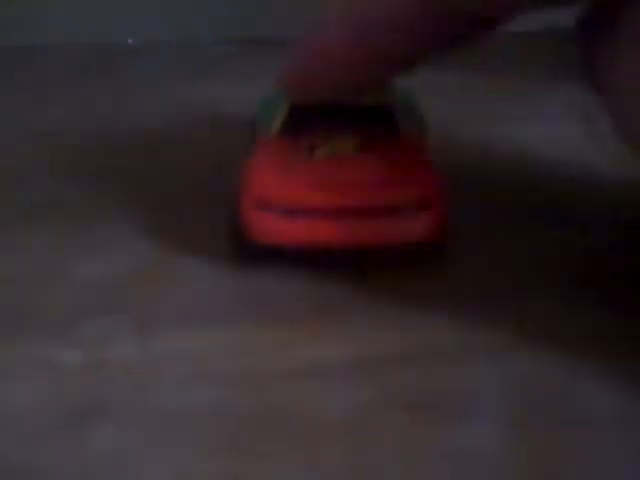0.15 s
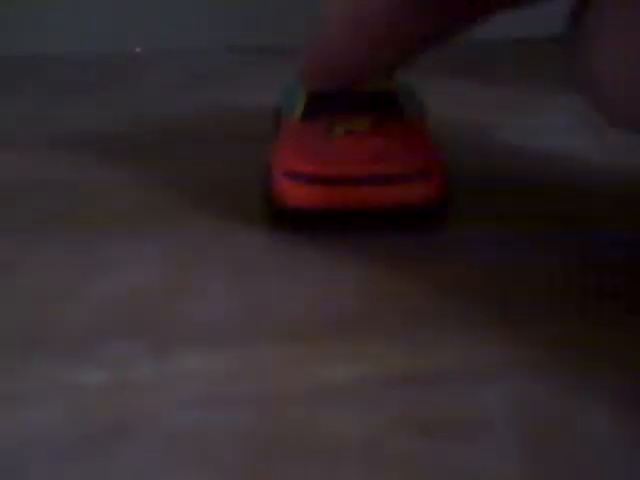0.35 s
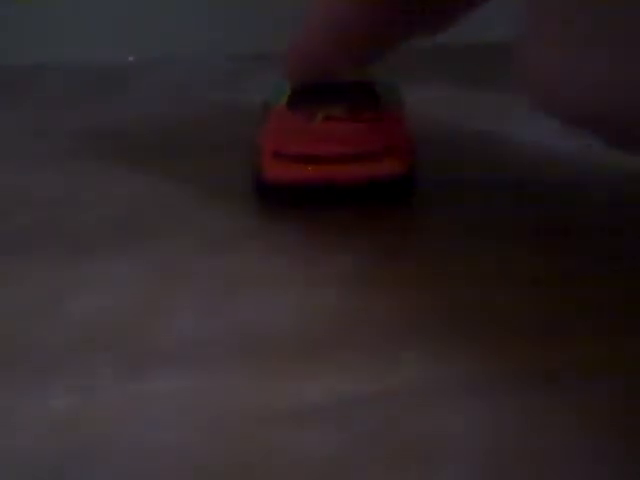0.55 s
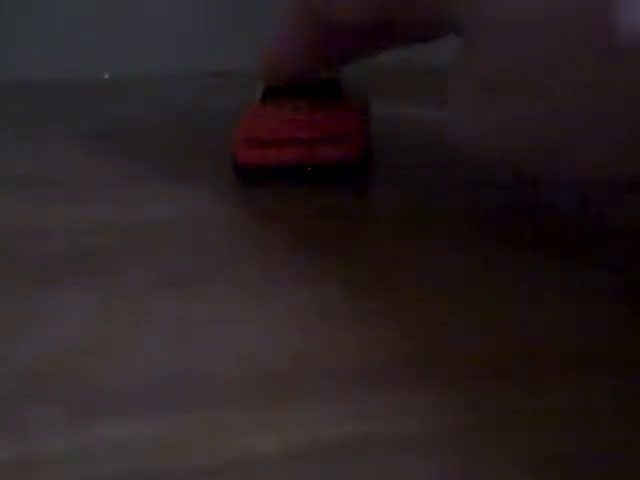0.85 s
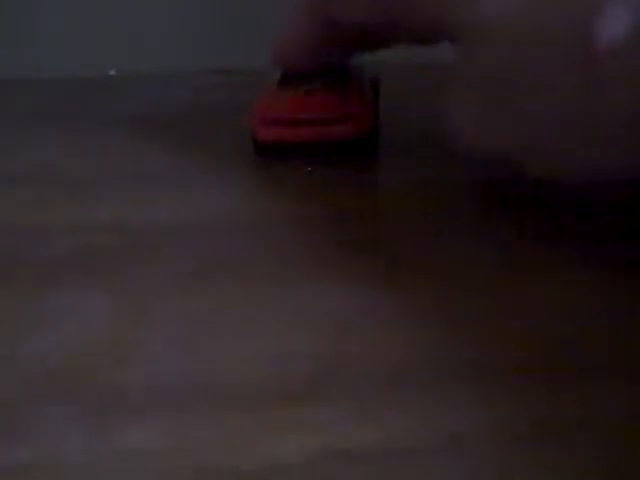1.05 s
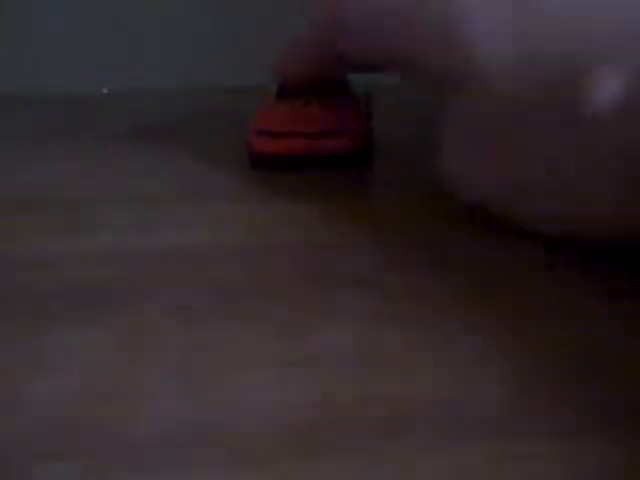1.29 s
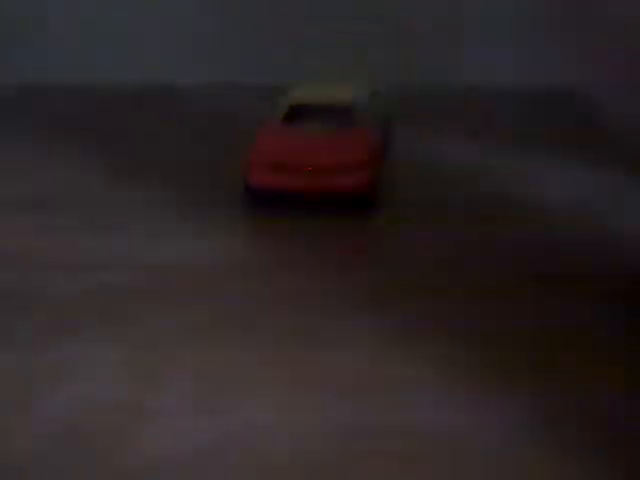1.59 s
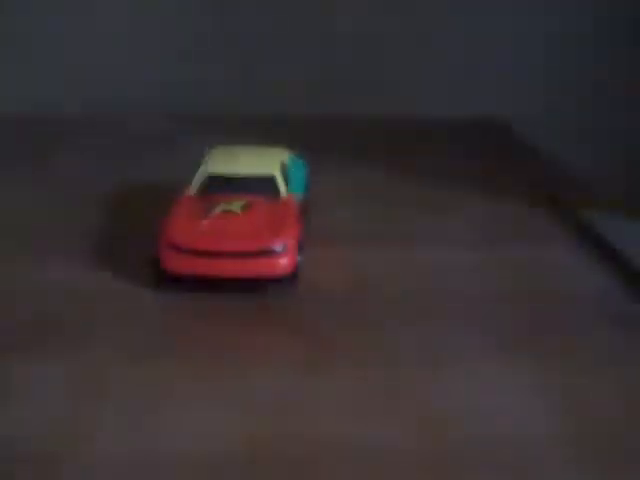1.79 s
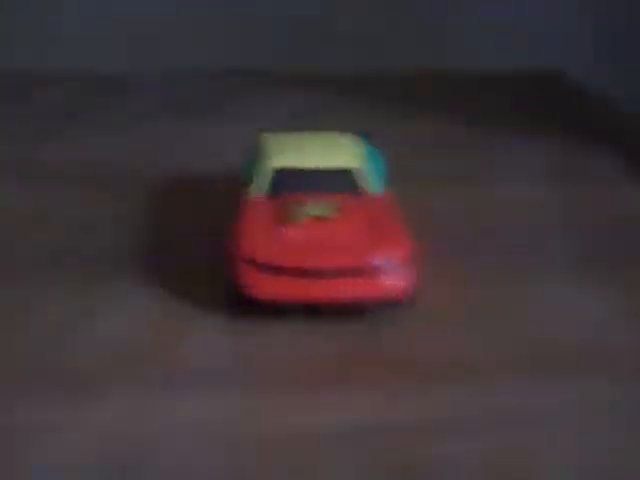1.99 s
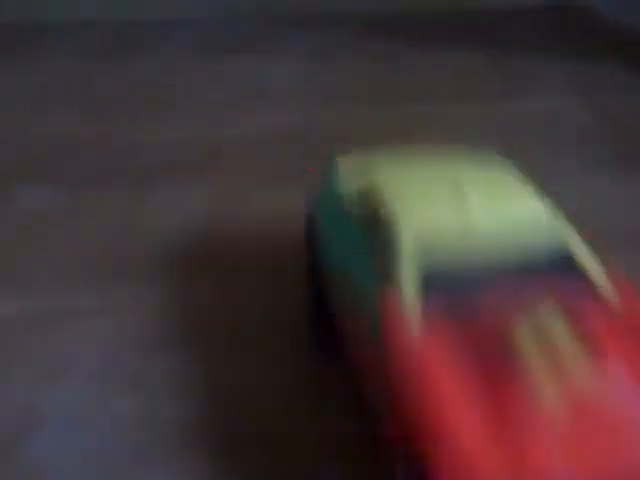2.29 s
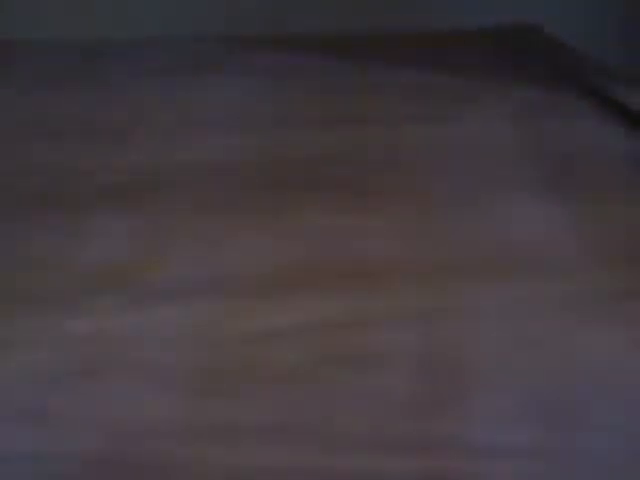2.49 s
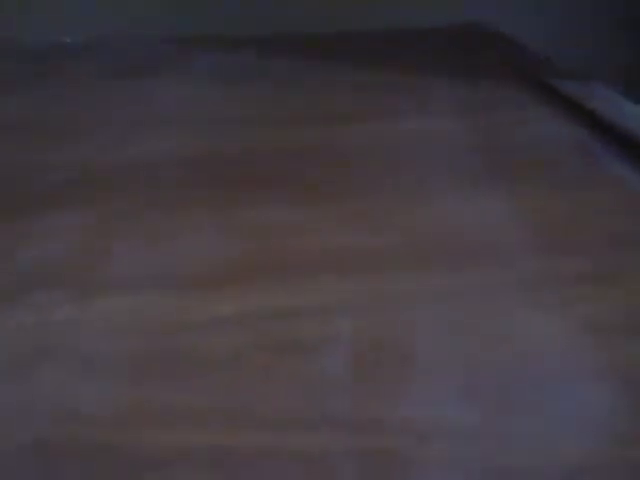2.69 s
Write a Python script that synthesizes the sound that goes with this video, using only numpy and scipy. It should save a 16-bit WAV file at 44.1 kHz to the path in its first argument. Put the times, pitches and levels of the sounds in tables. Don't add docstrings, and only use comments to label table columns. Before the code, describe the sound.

A pull-back toy car is wound on a wooden table with sharp ratchet clicks, then released; its gears rattle quickly past a very close microphone and it knocks to rest in a quiet small room.

```python
import sys
import numpy as np
from scipy import signal
from scipy.fft import rfft, irfft, next_fast_len
from scipy.io import wavfile
from scipy.ndimage import uniform_filter1d

SR = 44100
rng = np.random.default_rng(int(sys.argv[2]) if len(sys.argv) > 2 else 0)


def int16_out(signal):
    q = np.round(np.clip(np.atleast_2d(signal).T, -1, 1) * 32767)
    wavfile.write(sys.argv[1], SR, q.astype(np.int16))


def amplitude_ratio(level_db):
    exponent = np.asarray(level_db, float) / 20
    return 10 ** exponent


N = 125685
RUN_START_S, RUN_END_S = 1.5, 2.56
SLIPS_PER_S, SLIP_DB = 350, 5


def clock():
    return np.arange(N) / SR


def evened(x):
    return x / np.sqrt(np.mean(x ** 2) + 1e-20)


def read(points, hz):
    f, value = np.transpose(points)
    return np.interp(np.log(hz + 1), np.log(f + 1), value)


def control(table, column):
    rows = np.array(table)
    return amplitude_ratio(np.interp(clock(), rows[:, 0], rows[:, column]))


def stepped(s, values):
    latest = np.searchsorted(s * SR - 40, np.arange(N)) - 1
    return np.asarray(values)[np.maximum(latest, 0)]


def colour(x, points):
    log_gain = np.log(amplitude_ratio(read(points, abs(np.fft.fftfreq(2048, 1 / SR)))))
    taps = np.fft.ifft(np.exp(np.conj(signal.hilbert(log_gain)))).real[:1024]
    return signal.oaconvolve(x, taps / np.linalg.norm(taps))[:N]


def filtered(x, order, hz, kind="low"):
    return signal.sosfilt(signal.butter(order, hz, kind, fs=SR, output="sos"), x)


def resonate(x, hz, width_hz):
    turn = np.exp(2j * np.pi * np.cumsum(hz * np.ones(N)) / SR)
    r = np.exp(-np.pi * width_hz / SR)
    return 2 * (turn * signal.lfilter([1 - r], [1, -r], x / turn)).real


def body(x, modes):
    return sum((-1) ** k * amplitude_ratio(db) * resonate(x, hz, width) for k, (hz, width, db) in enumerate(modes))


def dying_tone(start_s, level_db, pitch_hz, t60_s):
    since = np.maximum(clock() - start_s, 0)
    return amplitude_ratio(level_db - 60 * since / t60_s) * np.sin(2 * np.pi * pitch_hz * since)


def grit(per_s, spread_db):
    size = amplitude_ratio(spread_db * np.minimum(rng.exponential(1, N), 4))
    return evened(rng.standard_normal(N) * size * (rng.random(N) < per_s / SR))


def chatter(s, db, hold_s, rise_s):
    fade_s, tail_db, tail_s, evenness = 0.0019, -20, 0.021, 0.52
    out, t = np.zeros(N + 2000), np.arange(2000) / SR
    for at, gain, hold in zip(s, amplitude_ratio(db), hold_s * np.ones(len(s))):
        decay = np.exp(-np.maximum(t - hold, 0) / fade_s) + amplitude_ratio(tail_db) * np.exp(-t / tail_s)
        shape = np.minimum(t / rise_s, 1) ** 2 * decay
        impacts, lumps = rng.standard_normal((2, 2000))
        clumps = abs(uniform_filter1d(lumps, size=24)) * 6 + evenness
        burst = shape * clumps * impacts
        burst *= np.linalg.norm(shape) / np.linalg.norm(burst)
        out[round(at * SR):][:2000] += 0.32 * gain * burst
    return out[:N]


def running():
    t = clock()
    return uniform_filter1d(1. * ((t > RUN_START_S) & (t < RUN_END_S)), size=3000)


# pitch_hz, level_db
AIR_SPECTRUM = [(12, -36), (20, -6), (108, -0.5), (818, -19), (2930, -16), (12400, -28), (15000, -59)]


def air():
    hz = np.fft.rfftfreq(N, 1 / SR)
    hiss = irfft(rfft(rng.standard_normal((2, N))) * amplitude_ratio(read(AIR_SPECTRUM, hz)), N)
    return amplitude_ratio(-58.5 + np.array([[4], [1]])) * evened(hiss)


def room(x, t60_s):
    t = np.arange(round(.4 * SR)) / SR
    signs = rng.choice([-1., 1.], (2, len(t)))
    taps = signs * (rng.random((2, len(t))) < .2) * amplitude_ratio(-60 * t / t60_s)
    taps /= np.linalg.norm(taps, axis=1, keepdims=True)
    return signal.fftconvolve(x[None], taps, axes=1)[:, :N]


# pitch_hz, likeness (0 to 1)
PORT_LIKENESS = [(100, .7), (400, .95), (10000, .62)]
# pitch_hz, level_db
PORT_SHADE = [(60, 6), (300, 11), (2800, 10.5), (5500, 13.5), (10000, 22)]
# start_s, level_db
PASSING_BY = [(2.5, 0), (2.68, 6.5)]


def ports(x):
    lead_s = 2.3e-5
    size = next_fast_len(N + 4096)
    hz = np.fft.rfftfreq(size, 1 / SR)
    same = np.clip(read(PORT_LIKENESS, hz), 0, 1)
    scatter = rfft(room(np.ones(1), .04)[0], size)
    path = same * np.exp(2j * np.pi * hz * lead_s) + np.sqrt(1 - same ** 2) * scatter
    right = irfft(rfft(x, size) * path * amplitude_ratio(-read(PORT_SHADE, hz)), size)[:N]
    return np.array([x, control(PASSING_BY, 1) * right])


# start_s, level_db
HISS_LEVEL = [(.08, -86), (.2, -60.5), (.33, -41), (.6, -44), (1.3, -52), (1.36, -43), (1.41, -60.5),
              (1.465, -43.5), (1.53, -64), (1.75, -36), (2.44, -35.5), (2.58, -44), (2.69, -27),
              (2.745, -32.5), (2.8, -42.5)]


def hiss_gain():
    return control(HISS_LEVEL, 1)


# start_s, pitch_hz
GROAN_PITCH = [(.3, 690), (.95, 704), (1.2, 820), (1.3, 660)]


def groan_hz():
    return np.interp(clock(), *np.transpose(GROAN_PITCH))


# start_s, level_db, upper_modes_db
ROLLING = [(0, -56, -0.5), (.19, -48.5, -8), (.25, -41, 1), (.37, -34.5, -2.5), (.62, -43.5, -9),
           (.85, -40.5, -8), (1.1, -57.5, 12), (1.3, -47.5, -1), (1.42, -59.5, -0.5), (1.5, -51.5, -1.5),
           (1.55, -43, -3), (1.83, -37, -1.5), (1.93, -44, 0.5), (2.53, -50, -1.5), (2.62, -66.5, -5)]
# pitch_hz, width_hz, level_db
WOOD_MODES = [(230, 11.5, 1.5), (311, 31, 5), (445, 27, 2), (517.6, 21, 1.5), (842, 6.4, -1),
              (1340, 1210, -7.5)]
# start_s, level_db, pitch_hz
WHEEL_DROPS = [
    (1.536, -38, 480),
    (1.561, -18.5, 480),
    (1.597, -15.5, 483),
    (2.698, -25, 286),
]


def wheels():
    push = uniform_filter1d(grit(700, 2), size=24) + 0.038 * rng.standard_normal(N)
    damping = amplitude_ratio(-9 * (1 - running()))
    low = damping * body(push, WOOD_MODES[:2]) + body(push, WOOD_MODES[2:4])
    high = body(push, WOOD_MODES[4:]) + amplitude_ratio(3) * resonate(push, groan_hz(), 85)
    drum = control(ROLLING, 1) * amplitude_ratio(3.0) * (low + control(ROLLING, 2) * high) / np.std(low)
    for start_s, level_db, pitch_hz in WHEEL_DROPS:
        drum = drum + dying_tone(start_s, level_db, pitch_hz, 0.0066)

    bounce = resonate(resonate(rng.standard_normal(N), 110, 98), 110, 88)
    bounce = amplitude_ratio(-49.5) * running() * evened(bounce)

    slip_density = uniform_filter1d(abs(grit(SLIPS_PER_S, SLIP_DB)), size=300)
    rustle = resonate(resonate(slip_density * rng.standard_normal(N), 2900, 2700), 3030, 2200)
    rustle = amplitude_ratio(-16.5) * hiss_gain() ** 0.64 * evened(rustle)
    return filtered(drum + rustle, 2, 170, "high") + bounce


# pitch_hz, level_db
PAWL_SPECTRUM = [(300, -43), (900, -19.5), (2200, -12.5), (4100, -8), (6000, -7), (7900, -1.5),
                 (10500, -16.5), (14000, -20.5), (15400, -42)]


def hard_plastic(x):
    return colour(x, PAWL_SPECTRUM)


# pitch_hz, width_hz, level_db
SHELL_MODES = [(2050, 102, 4), (2463, 210, 7), (4633, 200, 6.5), (5140, 73, -4.5), (6180, 910, -2),
               (6750, 310, 8.5), (7370, 640, 11)]
# start_s, level_db, chatter_s, hollow_ring_db
FINAL_BUMPS = [
    (2.473, -13, 0.014, 10),
    (2.489, -16, 0.0035, 14.5),
    (2.533, -8, 0.0027, 13),
    (2.536, -9.5, 0.0014, 14.5),
    (2.628, -10.5, 0.0076, -12),
    (2.697, -2, 0.0095, -3),
    (2.714, -13, 0.017, 6.5),
]


def bumps():
    s, db, hold_s, hollow_db = np.transpose(FINAL_BUMPS)
    hits = chatter(s, db, hold_s, 0.0014)
    wide, thud = hard_plastic(hits), amplitude_ratio(-20.5) * hits
    hollow = resonate(thud * amplitude_ratio(stepped(s, hollow_db)), 2870, 1800)
    hollow = amplitude_ratio(13) * (hollow + amplitude_ratio(8.5) * body(hollow, SHELL_MODES[:2]))
    wood = amplitude_ratio(-14) * resonate(body(thud, WOOD_MODES[:2]), 190, 167)
    return wide + amplitude_ratio(-7.0) * body(wide, SHELL_MODES) + wood + hollow


# start_s, level_db, lower_shell_db
GEAR_KNOCKS = [(1.5084, -25, -3), (1.5594, -34.5, 2), (1.566, -26, 3.5), (1.5803, -34, -5),
               (1.596, -29, -4), (1.6044, -28, 5), (1.6142, -25, 0), (1.6405, -23, 1),
               (1.6542, -11, -6), (1.668, -12, -5.5), (1.6807, -12, -13), (1.6967, -9.5, -11),
               (1.707, -16, 1), (1.7225, -23.5, -2.5), (1.7322, -1, -9), (1.7664, -8, -8.5),
               (1.7783, -10.5, -13), (1.789, -6.5, -37), (1.7984, -12, -6), (1.8115, -9, -9),
               (1.8236, -12.5, -2), (1.8365, -1, -6.5), (1.845, -8, -1), (1.8512, -6, -4.5),
               (1.8613, -10.5, -4), (1.8676, -6.5, -5.5), (1.8898, -15, -5),
               (1.8986, -7.5, -8), (1.9074, -11, -8), (1.9164, -7, -6), (1.925, -4.5, -15), (1.933, -9, -9),
               (1.9388, -5, -12), (1.9502, -5.5, -8), (1.959, -5, -22), (1.9636, -4.5, -11),
               (1.9725, -3, -9), (1.9795, -7, -11), (1.988, -4.5, -13), (2.0039, -4, -18), (2.013, -8, 0),
               (2.0184, -8, -12), (2.027, -7, -4.5), (2.0424, -5, -6), (2.0493, -8.5, -12),
               (2.0585, -5, -8), (2.069, -10, -13), (2.0751, -10, -7), (2.0838, -21, -0.5),
               (2.0913, -0.5, -16), (2.102, -1.5, -13), (2.1114, -5, -7), (2.121, -4, -15),
               (2.1317, -12.5, -7.5),
               (2.1468, -8.5, -7.5), (2.1634, -0.5, -21), (2.1729, -12, -12), (2.1797, -11, -6),
                   (2.1905, -7.5, -12), (2.2108, -9.5, -10.5), (2.2201, -11, -12), (2.2347, -4.5, -10),
                   (2.2434, -13.5, -5.5), (2.257, -39, 4), (2.2582, -3.5, -11), (2.2721, -7, -14.5),
                   (2.289, -7, -11.5), (2.3075, -5.5, -14), (2.3182, -5, -14), (2.333, -4, -20),
                   (2.3408, -11.5, -15), (2.3472, -7, -16), (2.357, -11.5, -15), (2.3697, -10, -19),
                   (2.3812, -10, -15), (2.3946, -5, -9), (2.4082, -3.5, -7), (2.4157, -6, -3.5),
                   (2.4283, -10, -3), (2.4336, -4.5, -6), (2.452, -19, -4.5)]
# pitch_hz, level_db
GEAR_SPECTRUM = [(530, -64), (900, -22.5), (2120, -12.5), (6000, -7), (8500, -10), (11000, -21.5),
                 (13500, -49)]


def gears():
    s, db, low_db = np.array(GEAR_KNOCKS).T
    knocks = chatter(s, db - 4, 0.00083, 0.00051)
    whir = hiss_gain() * running() * grit(3000, 2.5)
    x = colour(knocks + whir, GEAR_SPECTRUM)
    low_gain = amplitude_ratio(11.5 + uniform_filter1d(stepped(s, low_db), size=40))
    x = x + (low_gain - 1) * filtered(x, 2, 3500)
    return 0.8 * x + amplitude_ratio(6.5) * body(x, SHELL_MODES)


# start_s, level_db, pitch_hz, lower_body_db
PAWL_TOUCHES = [(0.0205, -19.5, 8470, -7.5), (0.0434, -41, 7150, 0), (0.1054, -43, 7370, 1),
                (0.1216, -33.5, 6930, -10), (0.1406, -34.5, 6920, -0.5), (0.1684, -18, 7370, -5.5),
                (0.179, -2.5, 6920, -15), (0.2224, -28.5, 7540, 1), (0.2577, -16.5, 7400, -2.5),
                (0.2867, -17, 5600, -9), (0.3142, -19, 7140, -18), (0.3254, -2.5, 5930, -16),
                (0.3344, -19, 7760, 0.5), (0.3408, -15.5, 7440, -6.5), (0.3532, -13, 7650, -16)]
# start_s, level_db, pitch_hz, lower_body_db
RATCHET_SNAPS = [(0.3751, 1.5, 8940, -17.5), (0.4031, -0.5, 7540, -19), (0.4349, -3, 8900, -17.5),
                 (0.4658, -2.5, 9300, -18.5), (0.5024, -4.5, 8300, -18), (0.5312, -6, 8140, -18.5),
                 (0.558, -9, 8000, -14), (0.5841, -5.5, 8130, -23), (0.6193, -12.5, 7800, -20),
                 (0.6673, -9, 8400, -15.5), (0.6976, -4.5, 9400, -19), (0.731, -10, 7000, -20),
                 (0.7657, -8.5, 6900, -14), (0.7942, -7.5, 7060, -14.5), (0.8234, -10.5, 8200, -13),
                 (0.849, -11.5, 6800, -13.5), (0.8773, -8, 6700, -14), (0.9096, -8, 6640, -16),
                 (0.9395, -13.5, 7800, -13.5), (0.9664, -13.5, 8700, -14.5), (1.0013, -8.5, 7000, -11.5),
                 (1.0386, -9.5, 7000, -12.5), (1.0746, -4.5, 6900, -11.5), (1.114, -10, 7430, -10),
                 (1.157, -7, 7230, -16), (1.2035, -9, 8200, -14.5), (1.2361, -6.5, 6550, -18),
                 (1.2756, -6.5, 8100, -20), (1.3429, -6.5, 7500, -24.5), (1.4373, -25, 7740, -15.5)]
# pitch_hz, width_hz, level_db
LOW_BODY_MODES = [(2190, 375, 11), (3040, 400, -33), (5530, 140, -10)]


def ratchet():
    t = clock()
    s, db, ring_hz, low_db = np.vstack([PAWL_TOUCHES, RATCHET_SNAPS]).T
    hold_s = np.repeat([0.0016, 0.0037], [len(PAWL_TOUCHES), len(RATCHET_SNAPS)])
    hold_s = hold_s * (1 + 0.56 * rng.uniform(-1, 1, len(s)))
    snaps = chatter(s, db + 1.5, hold_s, 0.0014)

    slip_burst = rng.standard_normal(100) * np.hanning(100)
    slips = evened(signal.oaconvolve(grit(SLIPS_PER_S, 1.2), slip_burst)[:N])
    rub = rng.standard_normal(N) + amplitude_ratio(SLIP_DB) * slips * (t < RUN_START_S)
    hiss = hiss_gain() * (1 - running()) * rub

    x = hard_plastic(snaps + hiss)
    low = filtered(x, 2, 5470)
    ring = amplitude_ratio(6.5) * resonate(hard_plastic(snaps), stepped(s, ring_hz), 600)
    shift = 1 + .5 * 0.18 * stepped(s, rng.uniform(-1, 1, len(s)))
    shifted = [(hz * shift, width, level) for hz, width, level in LOW_BODY_MODES]
    low_gain = amplitude_ratio(9 + uniform_filter1d(stepped(s, low_db), size=40))
    lower_body = low_gain * (low + body(x, shifted))

    bell = dying_tone(.181, -13.5, 4730, 0.039) + dying_tone(1.345, -39, 4730, 0.21)
    press = amplitude_ratio(4) * np.exp(-((t - 1.1) / 0.13) ** 2)
    pressed_wood = press * resonate(abs(snaps), groan_hz(), 51)
    return x - low + ring + lower_body + bell + pressed_wood


def scene():
    car = ratchet() + gears() + bumps()
    echo = amplitude_ratio(-21.5 + np.array([[0], [-23]])) * room(car, 0.32)
    return ports(car + wheels()) + echo + air()


def low_pass(x):
    return signal.sosfilt(signal.butter(12, 15550, fs=SR, output="sos"), x)


def record(dry):
    clipped = np.clip(dry, -.9, .9)
    mix = filtered(clipped, 6, 14800)
    return low_pass(mix)


dry = scene()
out = record(dry)
int16_out(out)
```